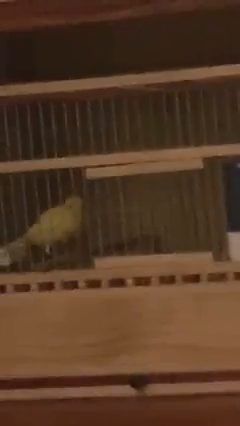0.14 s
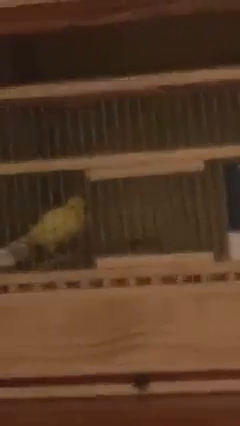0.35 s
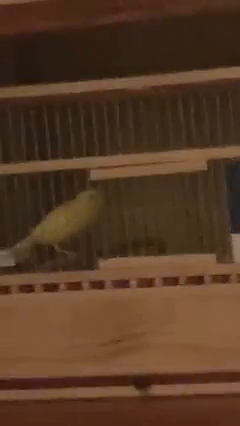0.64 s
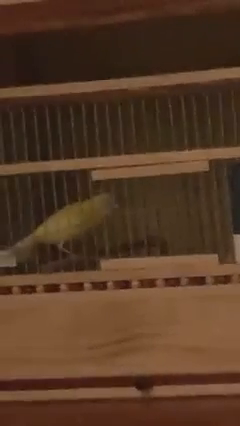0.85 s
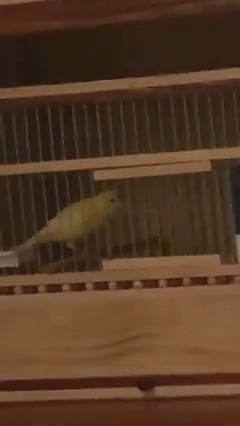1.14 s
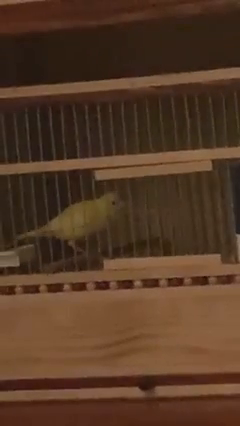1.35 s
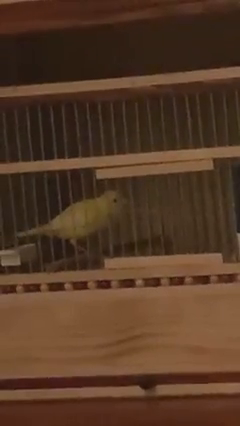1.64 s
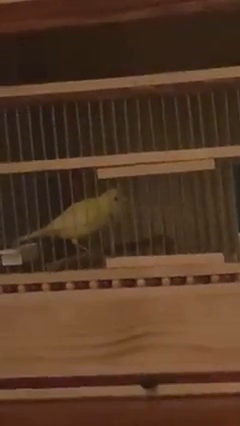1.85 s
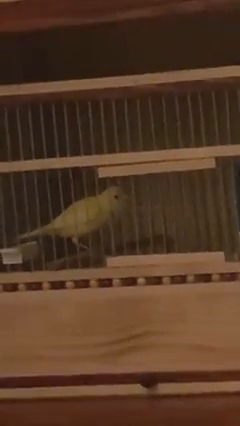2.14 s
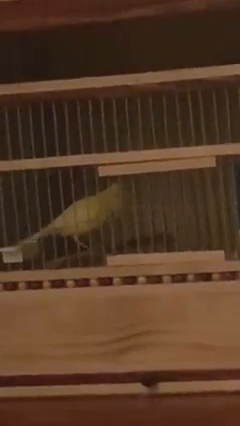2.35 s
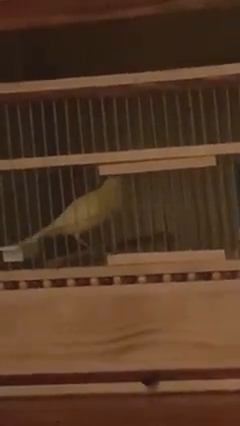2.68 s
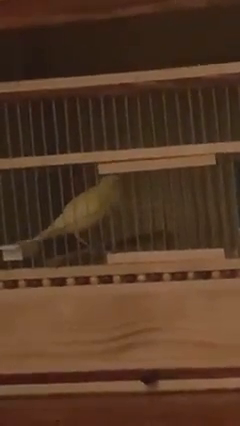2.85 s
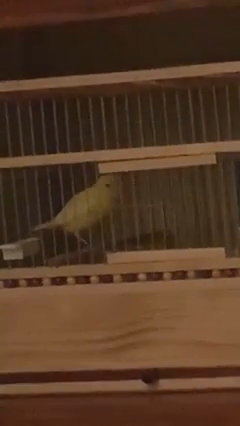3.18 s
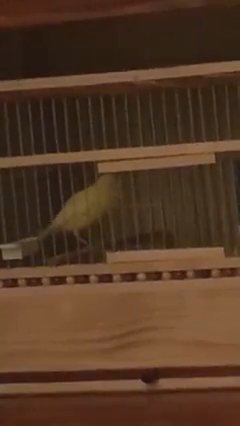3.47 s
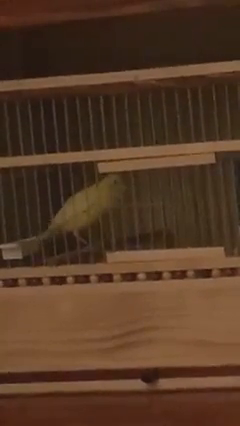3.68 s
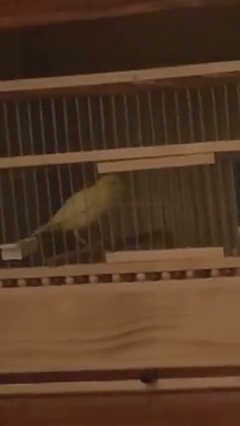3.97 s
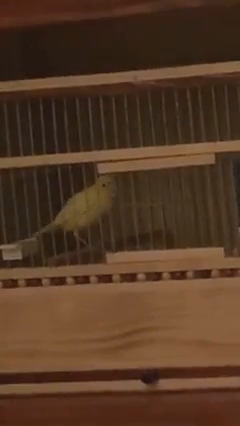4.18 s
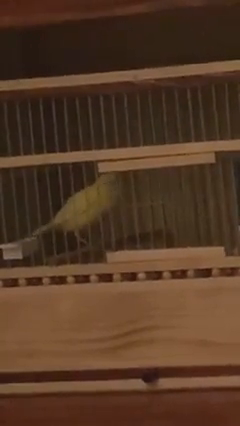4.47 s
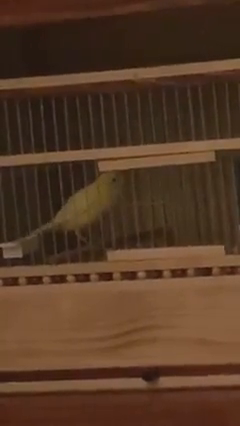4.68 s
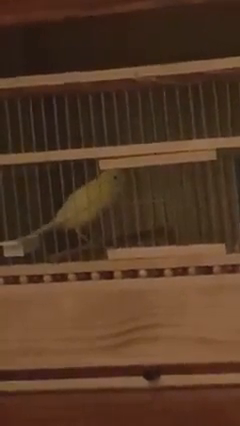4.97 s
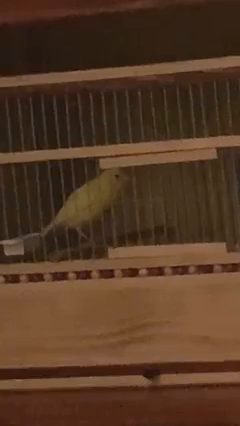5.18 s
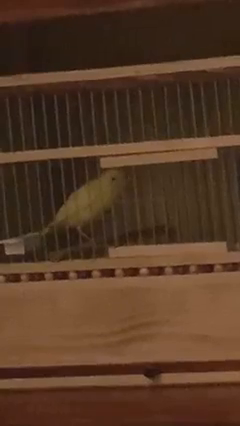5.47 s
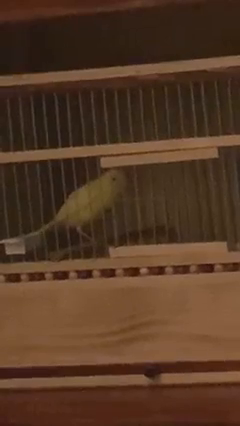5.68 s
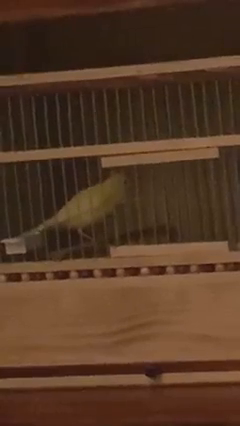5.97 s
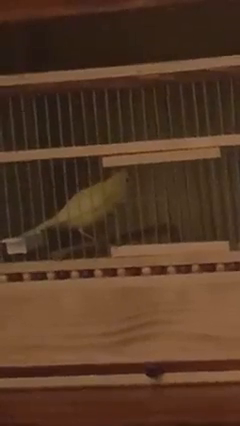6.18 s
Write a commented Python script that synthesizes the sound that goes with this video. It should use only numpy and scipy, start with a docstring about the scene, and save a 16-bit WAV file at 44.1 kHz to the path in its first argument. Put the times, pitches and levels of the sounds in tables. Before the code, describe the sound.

Several canaries sing nearby in wooden cages for about six and a half seconds, in a small room with a short, hard echo. Clear gliding whistles and brief buzzy trills overlap from the start. From about 2 to 4 seconds, higher notes drop onto pitch among raspy chips, thin squeaks and scratchy ticks. Soft falling whistles repeat from 3.4 to 5.3 seconds, with sharp pips near 3.5 and 4.2. Lower whistles take over around 5 seconds, and loud short pips follow at 6 to 6.2.

Much more quietly, feet knock irregularly on wooden perches and panels, most clearly near 1.3, 3 and 3.6 seconds. Seed husks rustle and wings flick, one flick standing out at 4.35. Dull cabinet thumps come now and then, the strongest near 3.9. A faint low room rumble runs throughout, with a hum swelling slightly around 2.7 seconds.

```python
"""A small, hard-walled room with canaries in wooden cages, several singing at once.
Each syrinx makes gliding, near-pure tones: whistles, trills and chips, edged with squeaks and ticks.
Feet knock perches and boom cage panels; wings and seed husks rustle.
Movement thuds through the cabinet, over a low room rumble and a faint hum."""
import sys
import numpy as np
from scipy import signal
from scipy.fft import rfft, irfft, next_fast_len
from scipy.io import wavfile

SR = 44100
rng = np.random.default_rng(int(sys.argv[2]) if len(sys.argv) > 2 else 0)


def master_out(mix):
    """Clip the mix to full scale and print it as 16-bit PCM to the path in sys.argv[1]."""
    frames = np.transpose(np.atleast_2d(mix))
    ceiling = np.clip(frames, -1, 1)
    pcm = np.round(ceiling * 32767).astype(np.int16)
    wavfile.write(sys.argv[1], SR, pcm)


N = 279153

# Levels are relative within a table. swell: rise over the note. tau: 1/e time either side of a peak.
# held, bent whistles: t/s, length/s, f_start/Hz, f_mid/Hz, f_end/Hz, level/dB, swell/dB
WHISTLE_NOTES = [(0, 0.02, 4300, 4178, 4120, -34.5, -18), (0, 0.052, 2790, 2612, 2630, -38, -18),
                 (0.358, 0.12, 2750, 2458, 2810, -48, 8), (0.42, 0.069, 2504, 2656, 2702, -39, -3),
                 (0.596, 0.079, 4397, 4370, 4250, -33, 8), (0.609, 0.17, 3260, 3396, 3327, -36.5, 12.5),
                 (0.636, 0.09, 4420, 4480, 4370, -34, 2), (0.783, 0.16, 3383, 3442, 3415, -33.5, -5.5),
                 (0.911, .11, 3057, 3029, 3210, -31.5, -10), (1.154, 0.1, 2150, 2121, 2308, -43, -5),
                 (1.202, 0.14, 4362, 4250, 3993, -33.5, 2.5), (1.456, 0.0885, 3150, 3154, 3046, -36.5, 7),
                 (1.494, 0.072, 3197, 3953, 4020, -36.5, 8), (1.529, 0.089, 3020, 3118, 3080, -35.5, -18),
                 (1.539, 0.1, 4086, 3947, 3965, -32.5, -7.5), (1.749, 0.083, 2066, 2301, 2420, -43.5, 0),
                 (1.989, 0.081, 4170, 4050, 4450, -38, -9), (1.985, 0.067, 2590, 2393, 2250, -57, 7),
                 (2.125, 0.089, 3260, 3195, 3350, -51, 9), (2.073, 0.24, 4546, 4800, 4560, -38.5, -4),
                 (2.406, 0.08, 2325, 2415, 2520, -43, -1), (2.466, 0.052, 2554, 2359, 2330, -40.5, 5),
                 (2.637, 0.12, 2447, 2394, 2298, -52.5, 17), (2.72, .052, 4064, 4085, 4060, -34, 18),
                 (2.738, .073, 5100, 5750, 6320, -40, 4), (2.825, 0.13, 4736, 4766, 4560, -34.5, -11),
                 (2.936, 0.2, 4787, 4576, 4580, -41.5, -34), (3.328, 0.094, 5600, 5470, 5820, -42.5, 14),
                 (3.57, 0.045, 2680, 2590, 2650, -61, 0), (3.861, 0.03, 2480, 2514, 2380, -49, -9),
                 (4.119, 0.07, 2670, 2460, 2430, -54, -2), (4.483, .034, 2670, 2622, 2670, -46, -1),
                 (4.72, 0.036, 2630, 2600, 2610, -50, 9), (4.838, 0.048, 3880, 4020, 4050, -42, -13),
                 (4.856, .085, 2115, 2135, 2095, -42.5, 21), (4.967, .28, 2050, 2141, 1993, -50.5, -23),
                 (5.076, 0.059, 2800, 2630, 2570, -65.5, -2), (5.335, 0.12, 2107, 2136, 2237, -44, 2),
                 (5.463, 0.25, 2324, 2138, 2310, -49.5, -2), (5.612, 0.059, 2170, 2074, 2147, -34.5, -10.5),
                 (5.752, 0.15, 2230, 2143, 2243, -47.5, 13.5), (5.968, 0.15, 2870, 3155, 3075, -37.5, 10.5),
                 (6.021, 0.12, 2070, 2136, 2053, -46.5, 17.5), (6.202, 0.076, 2186, 2065, 2220, -48.5, -4),
                 (6.225, 0.14, 2510, 2688, 2680, -41.5, -2)]
# t/s, length/s, f_mid/Hz, level/dB, swell/dB
SIGH_NOTES = [(3.381, 0.16, 3160, -40.5, 16), (3.652, 0.12, 3218, -43, -4),
              (3.798, 0.024, 3085, -45.5, -11), (3.931, 0.17, 3073, -49, 27.5),
              (4.213, 0.17, 3177, -41, -13), (4.378, 0.15, 3250, -35.5, 7.5),
              (4.561, 0.149, 3200, -40.5, -24.5), (4.634, 0.13, 3240, -35.5, 4),
              (4.88, .15, 3185, -35.5, -2.5), (5.19, 0.187, 3280, -40, 0.5)]  # soft falling whistles
SCOOP_NOTES = [(1.555, 0.023, 5450, -41, 12), (1.912, .07, 5460, -33.5, -6),
               (2.369, 0.0398, 5710, -34.5, 19), (2.415, 0.0493, 5710, -28.5, -3),
               (2.576, .06, 5703, -31.5, 4), (2.938, 0.068, 6110, -42, -15), (2.955, .1, 5604, -32, -18),
               (3.149, 0.045, 5686, -27.5, 9), (3.266, 0.0406, 6440, -32.5, 17),
               (3.725, 0.067, 5610, -42, -22), (3.755, 0.1257, 5580, -36, -4),
               (3.948, 0.105, 5493, -35.5, 7), (4.318, 0.041, 5310, -45.5, 0),
               (5.436, .041, 5584, -41.5, -15)]  # high notes dropping onto pitch
# buzzy slurs: t/s, length/s, f_start/Hz, f_end/Hz, level/dB, swell/dB
TRILL_NOTES = [(0.133, 0.16, 3164, 3090, -39, -11), (1.696, 0.078, 3400, 3663, -40.5, 20),
               (1.725, 0.18, 3583, 3913, -42, -6.5), (2.193, 0.043, 3940, 4170, -47.5, -9),
               (2.748, .084, 4214, 4124, -41.5, 21.5), (3.28, 0.069, 3834, 4123, -37.5, 1),
               (3.53, 0.085, 3850, 4305, -35.5, 2.5), (4.186, 0.17, 3987, 4720, -39.5, -42.5),
               (5.523, 0.056, 4750, 3887, -37, -12), (6.178, 0.014, 3430, 4350, -46, 10)]
# t/s, length/s, f_start/Hz, f_end/Hz, level/dB
CHIP_NOTES = [(1.12, 0.03, 4290, 3887, -42), (1.328, 0.016, 4080, 3120, -43),
              (1.462, 0.025, 5570, 4695, -51), (3.085, 0.041, 6460, 4920, -40),
              (3.1, 0.021, 4410, 3910, -39), (3.257, .032, 4170, 4395, -39.5),
              (3.494, 0.04, 6260, 5510, -45.5), (4.052, 0.03, 5050, 6620, -43),
              (4.091, 0.019, 5060, 3200, -38.5), (4.302, 0.038, 4530, 3110, -49.5),
              (4.502, 0.061, 5380, 4620, -52), (4.521, 0.013, 4400, 2410, -52.5),
              (4.757, 0.025, 4350, 5330, -44.5), (5.255, .044, 5550, 3190, -47.5),
              (5.298, .044, 3990, 4060, -44.5), (5.747, 0.042, 3982, 4120, -43),
              (5.873, 0.037, 4590, 4995, -40), (5.88, 0.031, 5930, 6200, -42.5),
              (6.009, .048, 6220, 5530, -45)]  # raspy flicks
PIP_NOTES = [(0.332, 0.0505, 3600, 3170, -34), (2.181, 0.018, 3326, 3540, -27),
             (3.513, 0.021, 4203, 3620, -24.5), (4.169, 0.04, 3922, 4116, -28.5),
             (6.013, 0.024, 4203, 4065, -23.5), (6.107, 0.016, 3456, 3280, -30),
             (6.18, .064, 3600, 3203, -34.5), (6.191, 0.016, 3580, 3404, -23)]  # short, loud, aimed at the listener
SQUEAK_NOTES = [(1.554, 0.027, 11200, 10720, -52.5), (2.838, 0.097, 9740, 9470, -60),
                (2.944, .04, 9900, 9200, -56.5), (2.95, 0.028, 12500, 11900, -60.5),
                (3.101, 0.036, 8300, 8130, -45), (3.114, 0.022, 9800, 11400, -46),
                (3.258, 0.032, 8200, 8900, -49), (3.51, 0.0246, 8400, 7780, -51),
                (3.761, 0.092, 11200, 10610, -54.5), (3.971, 0.066, 10800, 10750, -50.5),
                (4.298, 0.028, 10900, 10600, -52.5), (4.326, 0.022, 10100, 10830, -47.5),
                (4.339, 0.012, 9700, 9140, -56), (4.34, 0.0097, 7500, 7200, -60),
                (4.503, .045, 10500, 9500, -52.5), (4.761, 0.03, 9200, 10680, -53.5),
                (5.542, 0.045, 9700, 7840, -57), (6.018, .05, 7000, 8070, -55),
                (6.191, .035, 6660, 6850, -70)]  # thin, scratchy
# song radiation: f/Hz, gain/dB
SONG_EQ = [(1500, 6), (6200, -3), (7200, 1), (8300, 1.5), (9200, -8), (10800, 5.5), (11900, -14),
           (12800, -14), (14300, -13.5), (15500, -2)]
# room decay: f/Hz, t60/s
ROOM_T60 = [(2200, 0.34), (3200, 0.41), (4200, 0.3), (6000, 0.32), (10000, .22)]
# bright scratchy ticks: t/s, level/dB
BRIGHT_TICKS = [(3.118, -30.5), (4.0983, -37.5), (4.337, -33), (5.023, -35.5), (5.2724, -35.5),
                (5.3552, -35.5)]
# feet on perches: t/s, knock level/dB, panel level/dB, knock f/Hz
LANDINGS = [(0.091, -52, -76, 875), (0.138, -55.5, -59, 834), (0.498, -59.5, -70, 740),
            (0.601, -54, -66, 851), (0.833, -55, -63, 845), (1.108, -61.5, -58.5, 536),
            (1.208, -55.5, -77, 853), (1.337, -44, -57, 1100), (1.587, -88, -65, 1610),
            (1.859, -57, -72, 522), (1.941, -50, -73, 832), (2.424, -59.5, -61, 439),
            (2.514, -61.5, -60.5, 907), (2.691, -55, -56.5, 740), (2.76, -54.5, -59.5, 840),
            (2.93, -55.5, -86, 826), (3.009, -45, -66, 1200), (3.156, -47, -68, 1210),
            (3.639, -44.5, -62, 1450), (3.67, -55.5, -60, 455), (3.889, -47.5, -64, 910),
            (3.928, -52.5, -66, 673), (3.966, -53, -62, 746), (4.254, -57, -63.5, 797),
            (4.352, -51.5, -65, 423), (4.41, -60, -56, 433), (4.936, -47, -71, 826), (5.036, -55, -83, 834),
            (5.363, -53, -68, 1180), (5.944, -51.5, -84, 826)]
# wood resonances: f/Hz, bandwidth/Hz, level/dB
PERCH_MODES = [(452, 30, 2), (677, 42, -2), (840, 53, 2.5), (1066, 120, -3.5), (1190, 150, -1.5),
               (1670, 640, -7.5)]  # perch and cage front
PANEL_MODES = [(215, 18, -1), (298, 50, -11.5), (138, 5.9, -8.5)]  # back panel
# swells: t_peak/s, tau/s, level/dB
THUMP_SWELLS = [(.66, 0.046, -61), (1.09, .05, -62.5), (2.01, 0.068, -65), (2.37, 0.071, -61),
                (2.73, 0.1, -64), (3.85, 0.04, -56), (4.04, .03, -69), (4.6, 0.04, -60), (4.81, 0.11, -66)]  # cabinet
HUSK_SWELLS = [(.02, .07, -63), (1.95, 0.12, -61), (2.43, 0.095, -61.5), (3.17, 0.092, -63),
               (3.68, .05, -62), (3.96, 0.041, -58), (4.27, 0.28, -62), (4.53, .05, -69), (4.72, .1, -66.5),
               (5.99, 0.065, -71)]  # shuffling in seed husks
WING_SWELLS = [(.02, 0.074, -65.5), (1.33, 0.076, -61.5), (2.375, 0.05, -59.5), (2.77, 0.043, -66),
               (2.98, 0.13, -67.5), (3.29, .04, -61.5), (4.35, 0.017, -48.5), (5.05, 0.16, -74.5),
               (5.44, 0.045, -63.5), (6.24, 0.18, -67.5)]  # wing flicks
HUM_SWELLS = [(2.719, 0.45, -58)]
# noise spectra: f/Hz, density/dB
TICK_SPECTRUM = [(1500, -7), (3500, -13.5), (7000, 11.5), (10500, 2), (13000, -7), (15500, -4.5)]
THUMP_SPECTRUM = [(13, -32), (22, -3.5), (64, -1.5), (87, -2), (130, -8.5), (200, -5.5), (260, -32),
                  (440, -120)]
RUMBLE_SPECTRUM = [(20, -37), (30, -23), (42, -4), (64, -4.5), (85, -3.5), (125, -6.5), (170, -10.5),
                   (300, -16), (600, -66.5)]
HUSK_SPECTRUM = [(60, -9.5), (130, -2.5), (240, 0.5), (370, -2.5), (500, 3), (700, -4), (950, -2.5),
                 (1130, 1), (1220, 5.5), (1320, -1), (1450, -7), (1900, -4.5), (2800, -14.5), (5000, -28.5)]
WING_SPECTRUM = [(1200, -35.5), (2000, -1.5), (4000, 11), (5200, -19), (7000, 1.5), (8300, -12),
                 (9800, 2.5), (11500, -19.5), (13000, -18.5), (15500, -13.5)]


def canaries():
    """Six syllable types, each with its own glide, overtones and share of room."""
    song = np.zeros(N)
    for t_s, length_s, *glide_hz, db, swell_db in WHISTLE_NOTES:
        add(song, t_s, sing(length_s, glide_hz, db, swell_db, overtone_db=-29, buzz_hz=7.7, wet_db=-2))
    for t_s, length_s, hz, db, swell_db in SIGH_NOTES:
        add(song, t_s, sing(length_s, (1.03 * hz, hz, 0.97 * hz), db, swell_db,
                            overtone_db=-26.5, buzz_hz=8.7, wet_db=-3.5, flutter_db=4))
    for t_s, length_s, hz, db, swell_db in SCOOP_NOTES:
        add(song, t_s, sing(length_s, (1.035 * hz, hz, 0.98 * hz), db, swell_db,
                            overtone_db=-42, buzz_hz=29, wet_db=-1, waver=0.0042, flutter_db=3.2))
    for t_s, length_s, start_hz, end_hz, db, swell_db in TRILL_NOTES:
        add(song, t_s, sing(length_s, np.linspace(start_hz, end_hz, 3), db, swell_db,
                            overtone_db=-31, buzz_hz=125, wet_db=4.2))
    for t_s, length_s, start_hz, end_hz, db in CHIP_NOTES:
        add(song, t_s, sing(length_s, np.linspace(start_hz, end_hz, 3), db, swell_db=1.5,
                            overtone_db=-18.5, buzz_hz=70, wet_db=3, waver=0.008))
    for t_s, length_s, start_hz, end_hz, db in PIP_NOTES:
        add(song, t_s, sing(length_s, np.linspace(start_hz, end_hz, 3), db, swell_db=-1.5,
                            overtone_db=-28.5, buzz_hz=22, wet_db=-4))
    return filtered(song, lambda hz: amp(along(SONG_EQ, hz)))


def sing(length_s, glide_hz, db, swell_db, overtone_db, buzz_hz, wet_db, waver=0.0024, flutter_db=3.5):
    """One note through cage and room; louder notes are purer."""
    usual_db = -37
    overtone_db -= 0.29 * (db - usual_db)
    note = syrinx(length_s, glide_hz, swell_db, overtone_db, buzz_hz, waver, flutter_db)
    return amp(db) * room(cage(note), wet_db, along(ROOM_T60, glide_hz[1]))


def syrinx(length_s, glide_hz, swell_db, overtone_db, buzz_hz, waver, flutter_db, buzz_rate_hz=170):
    """Sine on a parabolic glide, frequency-modulated by +/- buzz_hz, with weak raspy overtones."""
    start_hz, mid_hz, end_hz = glide_hz
    n = int(length_s * SR)
    t = np.arange(n) / SR
    u = t / t[-1]
    path_hz = start_hz * (1 - u) * (1 - 2 * u) + 4 * mid_hz * u * (1 - u) + end_hz * u * (2 * u - 1)
    buzz = np.sin(2 * np.pi * buzz_rate_hz * t + wobble(57.2, n))
    slip_hz = 0.0032 * np.abs(np.gradient(path_hz)) * SR  # faster slur, less steady tone
    pitch_hz = path_hz * (1 + waver * wobble(121.3, n)) + buzz_hz * buzz + slip_hz * wobble(903.6, n)
    phase = 2 * np.pi * np.cumsum(pitch_hz) / SR
    raspy_phase = phase + 0.075 * wobble(1400, n)
    overtones = sum(amp(db) * np.sin(k * raspy_phase)
                    for k, db in ((2, 0), (3, -9), (4, -20)) if k * mid_hz < SR / 2)
    arch = np.abs(np.sin(np.pi * u)) ** 0.66
    pressure = arch * amp(swell_db * (u - 0.5) + flutter_db * wobble(110, n))
    beak_gain = amp(7.76 * wobble(220, n) - 1.5)  # overtones come and go with the beak
    return pressure * (np.sin(phase) + amp(overtone_db) * beak_gain * overtones)


def squeaks(scratch_hz=270, scratch_rate_hz=900):
    """Thin, scratchy high squeaks, many of them overtones of the sung notes."""
    track = np.zeros(N)
    for t_s, length_s, start_hz, end_hz, db in SQUEAK_NOTES:
        u = np.linspace(0, 1, int(length_s * SR))
        pitch_hz = start_hz + (end_hz - start_hz) * u + scratch_hz * wobble(scratch_rate_hz, len(u))
        arch = np.sqrt(np.abs(np.sin(np.pi * u)))
        squeak = arch * np.sin(2 * np.pi * np.cumsum(pitch_hz) / SR)
        add(track, t_s, amp(db + 3) * room(squeak, wet_db=-1, t60_s=along(ROOM_T60, start_hz)))
    return track


def ticks(rise_s=0.0095, decay_s=0.0066, lead_s=0.005):
    """Brief, bright, scratchy ticks, most of them the raspy edge of a chirp."""
    track = np.zeros(N)
    t = np.arange(SR // 10) / SR
    envelope = np.exp(-t / decay_s) * (1 - np.exp(-t / rise_s)) ** 2
    for t_s, db in BRIGHT_TICKS:
        burst = envelope * noise(TICK_SPECTRUM, len(t))
        add(track, t_s - lead_s, amp(db - 2) * room(burst, wet_db=4.5, t60_s=0.1))
    return track


def hops(focus_db_per_oct=11):
    """A landing rings the perch modes near its pitch and booms the back panel."""
    track = np.zeros(N)
    for t_s, knock_db, panel_db, knock_hz in LANDINGS:
        modes = [(hz, width_hz, db - focus_db_per_oct * abs(np.log2(hz / knock_hz)))
                 for hz, width_hz, db in PERCH_MODES]
        add(track, t_s, amp(knock_db) * knock(modes, contact_s=0.014))
        add(track, t_s, amp(panel_db + 4.5) * knock(PANEL_MODES, contact_s=0.0083))
    return track


def patter(steps_per_s=2, softest_db=-66.5, range_db=6):
    """Light steps at random times ring the same perch and panel."""
    track = np.zeros(N)
    for when, force, boom in rng.random((int(steps_per_s * N / SR), 3)):
        step = knock(PERCH_MODES, contact_s=0.0045) + boom * knock(PANEL_MODES, contact_s=0.0087)
        add(track, when * N / SR, amp(softest_db + range_db * force) * step)
    return track


def knock(modes, contact_s, rise_s=0.00052, dull_hz=3500):
    """A scuff rings wood modes at random strengths, in the room; peak 1."""
    def wood(f):
        return sum((-1) ** k * amp(db + rng.normal(0, 3))
                   * 1j * f * width_hz / (hz * hz - f * f + 1j * f * width_hz)
                   for k, (hz, width_hz, db) in enumerate(modes))

    t = np.arange(SR // 8) / SR
    scuff = rng.standard_normal(len(t)) * np.exp(-t / contact_s) * (1 - np.exp(-t / rise_s))
    ring = filtered(scuff, wood)
    dulled = filtered(ring, lambda f: 1 / (1 + 1j * f / dull_hz) ** 2)  # dull knock, little treble
    heard = room(dulled, wet_db=2.5, t60_s=0.19)
    return heard / np.abs(heard).max()


def rustle():
    """Moving birds stir seed husks and feathers: two noises, one shared flutter."""
    flutter = wobble(30, N)
    husks = swells(HUSK_SWELLS, rest_db=-78) * amp(0.18 + 3.25 * flutter) * noise(HUSK_SPECTRUM, N)
    wings = swells(WING_SWELLS, rest_db=-85) * amp(0.5 + 0.78 * flutter) * noise(WING_SPECTRUM, N)
    return husks + wings


def cabinet():
    """Moving birds shake the cabinet: dull thumps."""
    return swells(THUMP_SWELLS, rest_db=-84) * amp(wobble(37, N) - 0.5) * noise(THUMP_SPECTRUM, N)


def rumble(level_db=-71):
    """Low, slightly wavering room noise."""
    return amp(level_db + 1.6 * wobble(17, N)) * noise(RUMBLE_SPECTRUM, N)


def hum(hz=63):
    """Faint room drone with one swell."""
    tone = np.sin(2 * np.pi * hz * np.arange(N) / SR)
    return swells(HUM_SWELLS, rest_db=-81) * amp(2 * wobble(14, N)) * tone


def cage(x, echoes=6):
    """Nearby boards return copies 2-17 ms late that beat against a glide; energy is kept."""
    impulse = np.zeros(SR // 60)
    impulse[0] = 1
    impulse[rng.integers(SR // 500, len(impulse), echoes)] = 0.2 * rng.choice([-1, 1], size=echoes)
    heard = signal.fftconvolve(x, impulse)
    return heard * np.linalg.norm(x) / np.linalg.norm(heard)


def room(x, wet_db, t60_s, build_s=0.00093):
    """Direct sound plus a hard-wall tail, drawn anew for each bird position."""
    t = np.arange(SR // 3) / SR
    tail = rng.standard_normal(len(t)) * np.exp(-np.log(1000) * t / t60_s) * (1 - np.exp(-t / build_s))
    echo = signal.fftconvolve(x, tail)
    heard = amp(wet_db) * echo * np.linalg.norm(x) / np.linalg.norm(echo)
    heard[:len(x)] += x
    return heard


def swells(rows, rest_db):
    """Gain: exponential peaks over a resting level, summed in power."""
    t = np.arange(N) / SR
    power = sum((amp(db) * np.exp(-np.abs(t - peak_s) / tau_s)) ** 2 for peak_s, tau_s, db in rows)
    return np.sqrt(power + amp(rest_db) ** 2)


def wobble(rate_hz, n):
    """Random curve, linear between Gaussian knots."""
    at = np.arange(n) * rate_hz / SR
    knots = rng.spawn(1)[0].standard_normal(int(at[-1]) + 2)
    return np.interp(at, np.arange(len(knots)), knots)


def noise(spectrum, n):
    """Coloured noise, rms 1."""
    x = filtered(rng.standard_normal(n), lambda hz: amp(along(spectrum, hz)))
    return x / np.sqrt(np.mean(x ** 2) + 1e-20)


def filtered(x, response):
    """Apply a complex frequency response."""
    n_fft = next_fast_len(len(x) + 2048, True)
    return irfft(rfft(x, n_fft) * response(np.fft.rfftfreq(n_fft, 1 / SR)), n_fft)[:len(x)]


def along(points, hz):
    """Interpolate (f/Hz, value) points on a log axis."""
    points_hz, values = np.transpose(points)
    return np.interp(np.log(hz + 1), np.log(points_hz + 1), values)


def amp(db):
    """dB to gain."""
    return 10 ** (np.asarray(db) / 20)


def add(track, t_s, x):
    """Mix x in at t_s."""
    start = max(round(t_s * SR), 0)
    part = x[:max(N - start, 0)]
    track[start:start + len(part)] += part


def scene():
    """Song over cage and room noises, mono."""
    birds = canaries() + squeaks() + hops() + patter() + ticks() + rustle()
    return (birds + cabinet() + rumble() + hum())[None]


def record(dry, top_hz=15850):
    """Brick-wall low-pass."""
    return np.array([filtered(x, lambda hz: hz < top_hz) for x in dry])


dry = scene()
out = record(dry)
master_out(out)
```